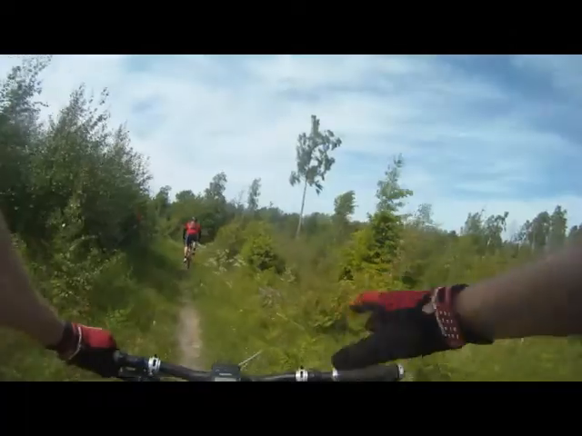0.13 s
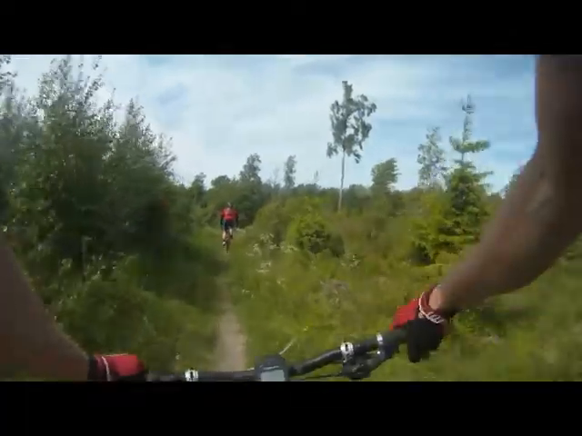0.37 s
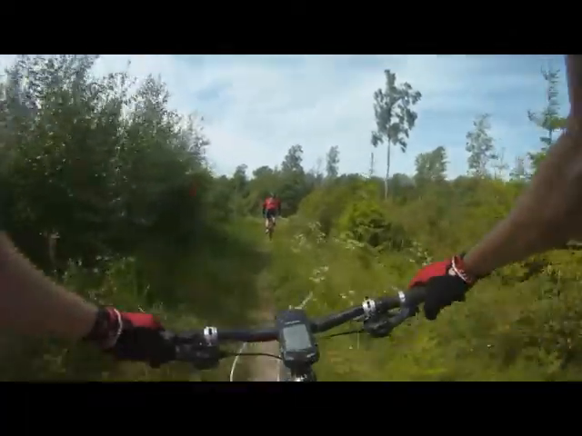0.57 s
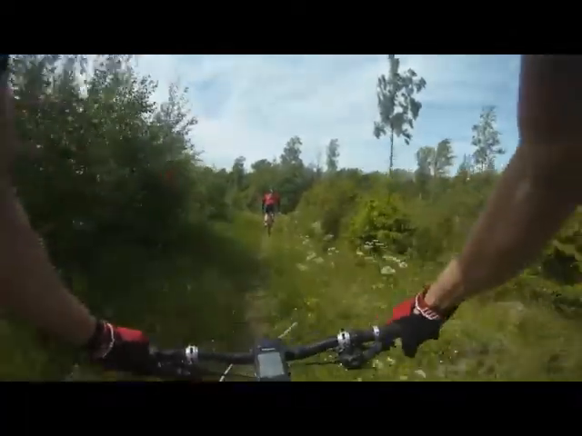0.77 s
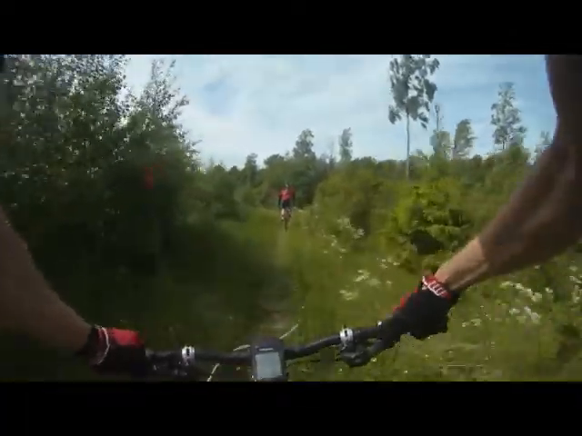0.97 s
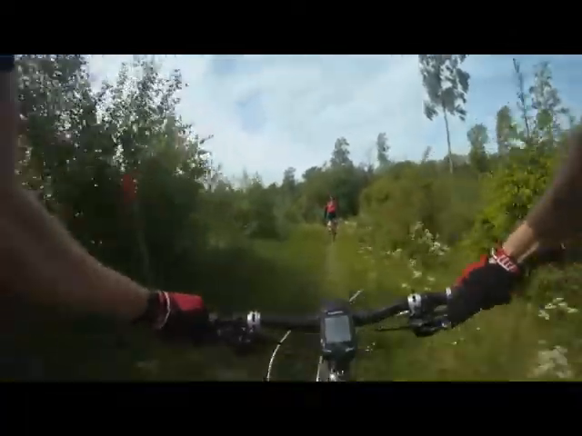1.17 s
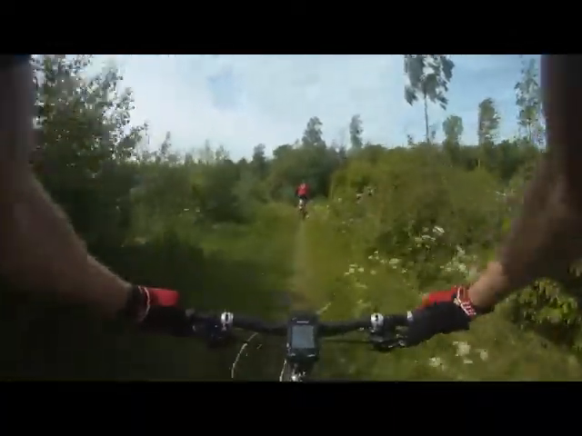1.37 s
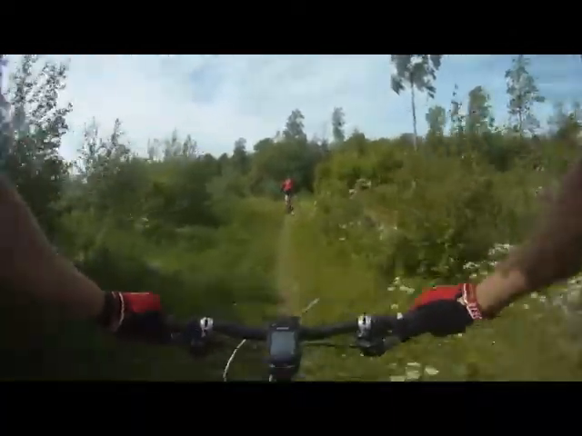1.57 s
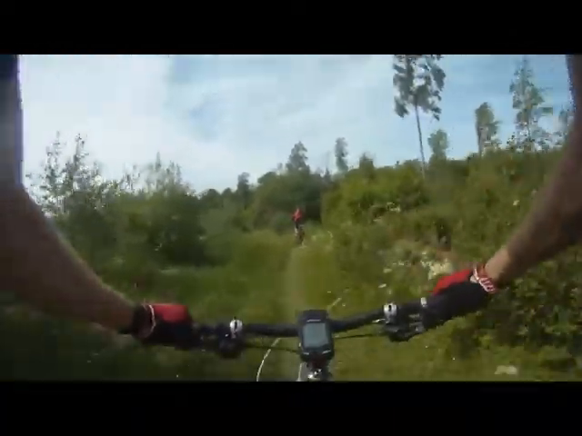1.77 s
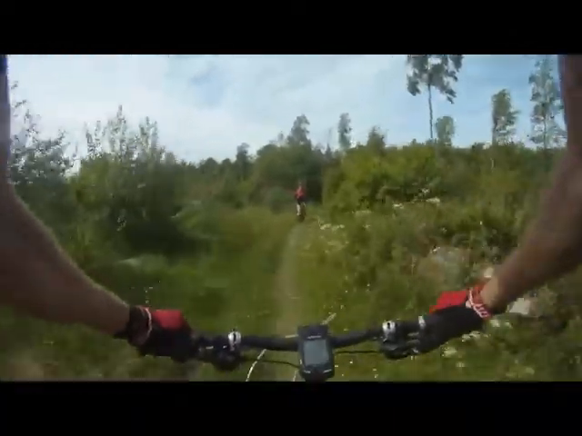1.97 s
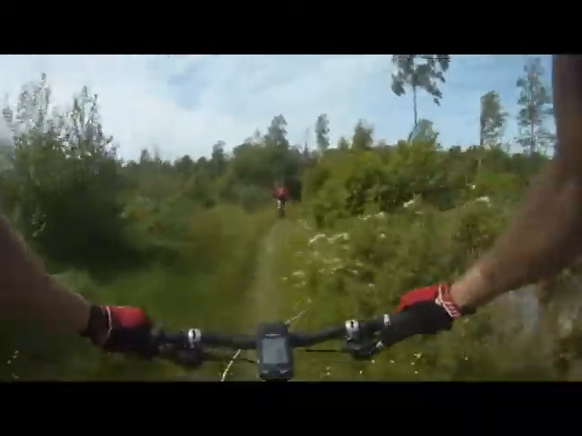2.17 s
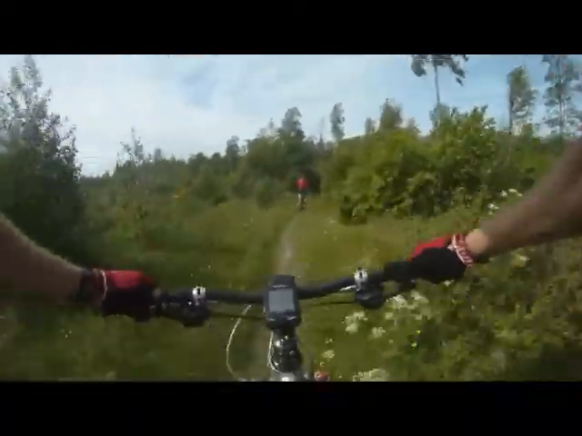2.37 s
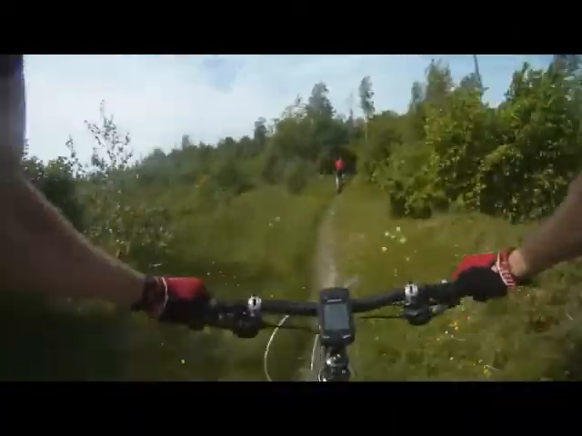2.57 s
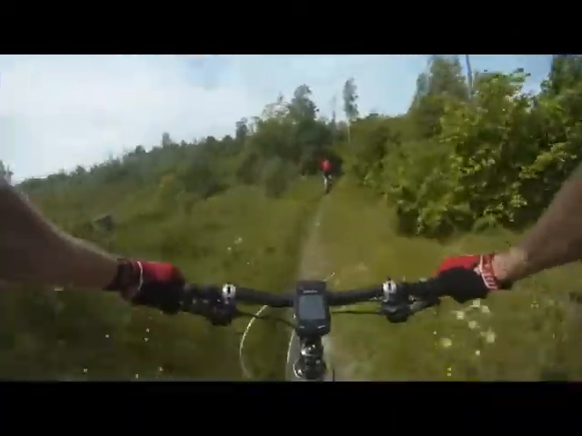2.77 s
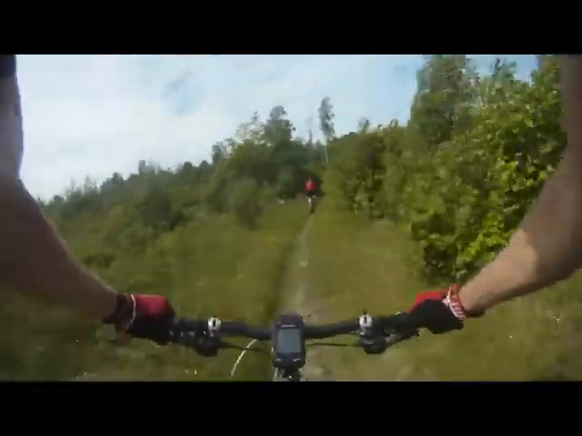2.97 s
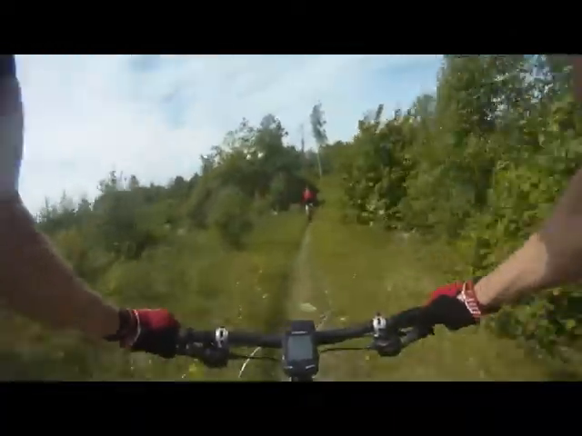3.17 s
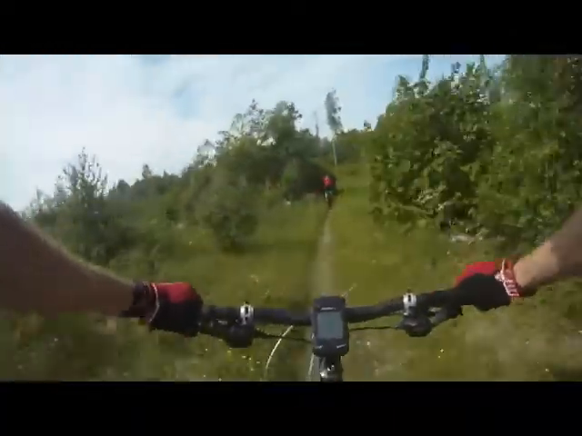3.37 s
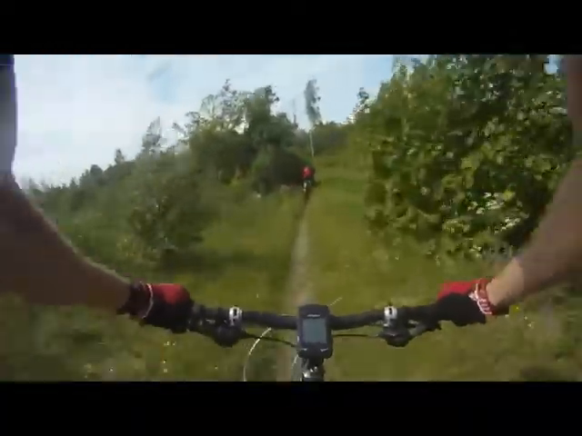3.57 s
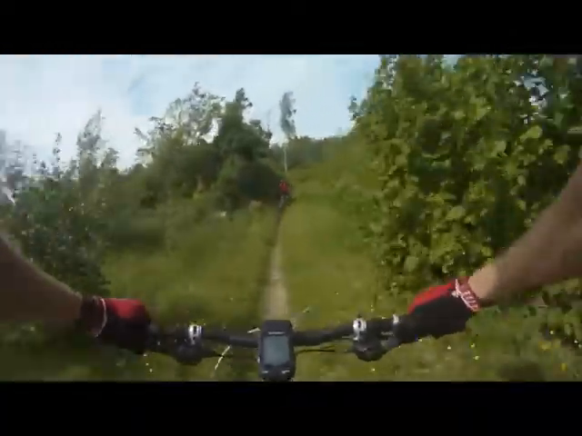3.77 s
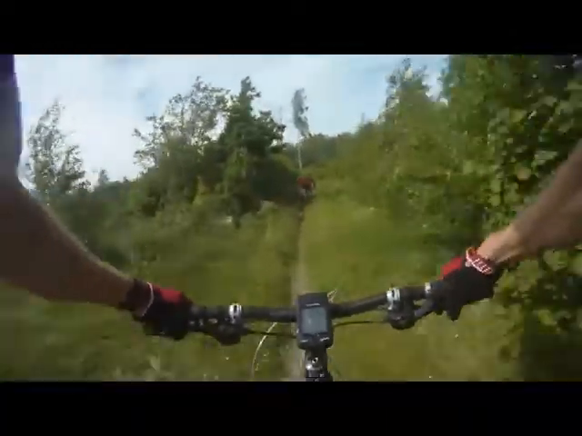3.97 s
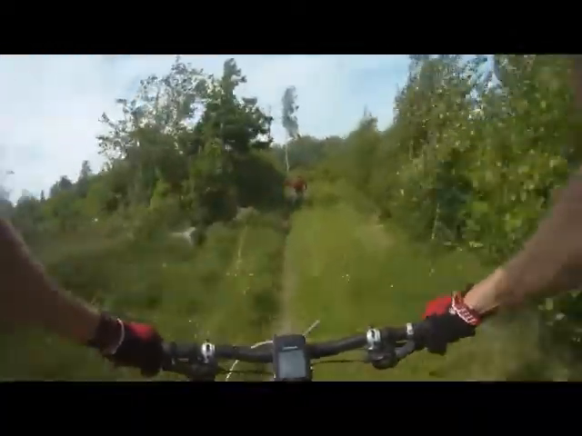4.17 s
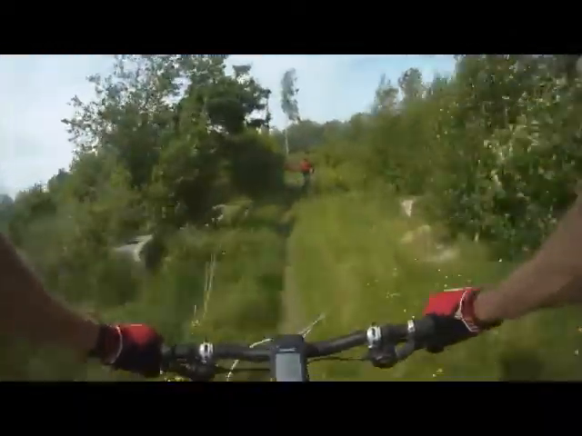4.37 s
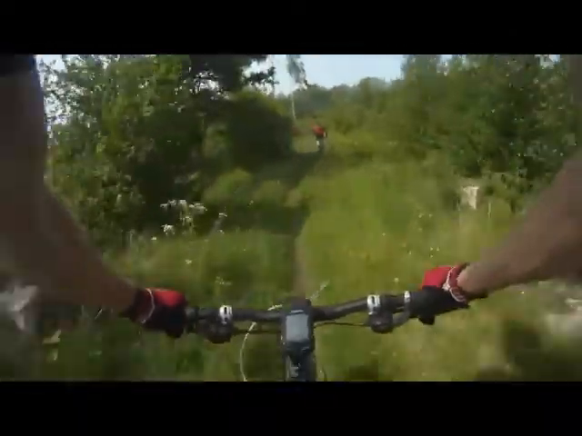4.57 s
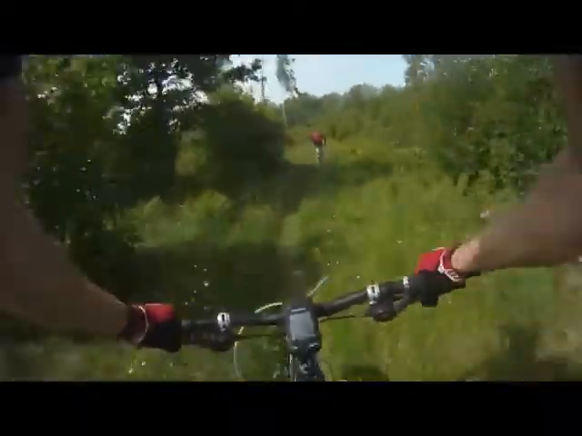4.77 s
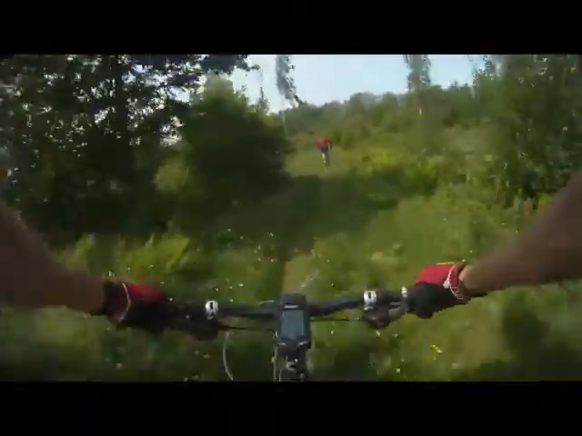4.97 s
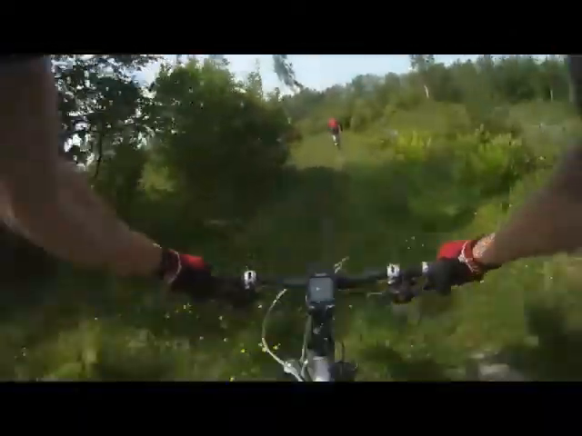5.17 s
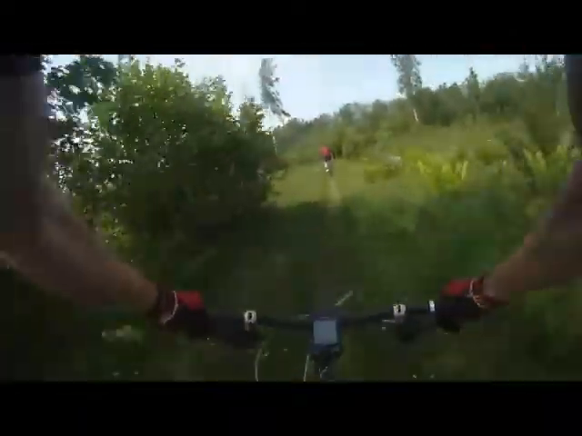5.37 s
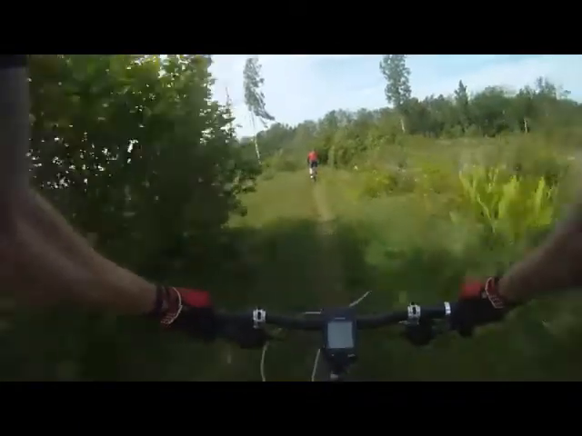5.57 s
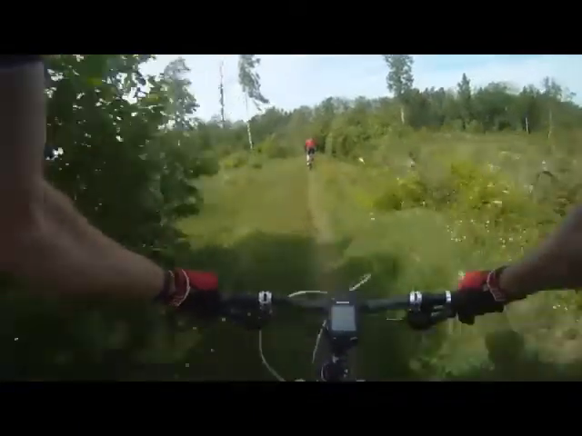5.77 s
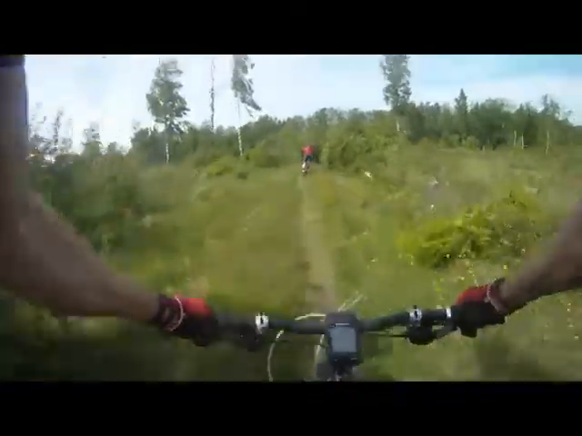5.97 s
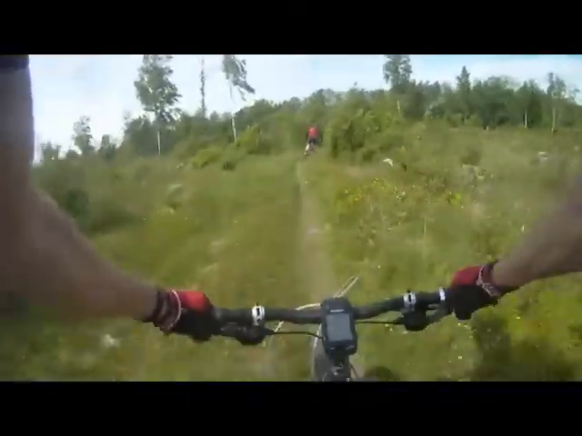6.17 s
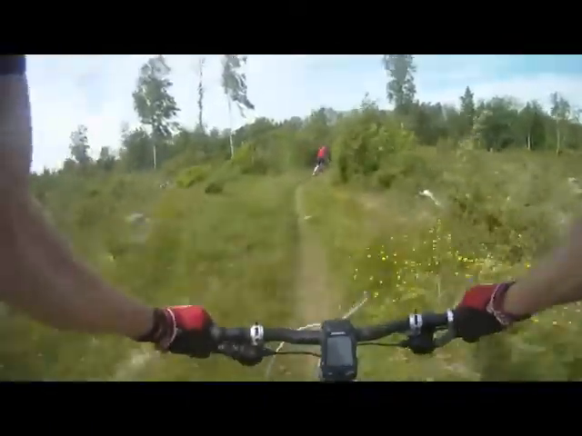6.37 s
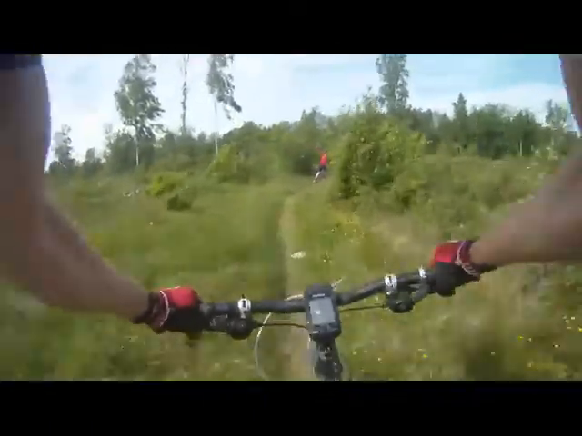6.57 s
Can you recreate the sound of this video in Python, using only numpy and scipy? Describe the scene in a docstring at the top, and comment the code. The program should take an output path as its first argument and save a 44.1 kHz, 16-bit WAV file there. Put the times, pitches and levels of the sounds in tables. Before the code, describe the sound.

A mountain bike runs down a bumpy trail through open grassland, heard through a plastic camera housing on the rider's chest, muffled yet gritty, with coarse treble. At 0 seconds a very loud, sharp knock cracks out with a tiny metallic tick. Until about 1.3 the wind is low and the tyre and grass hiss faint, with small clatters at 0.3, 0.6 and 1.1 to 1.3. More clattering comes at 1.5, and a wind puff at 1.6. Around 2.1 there are knocks and a short ping; at 2.4 another very loud, hollow knock with a clatter. From 2.5 wind rumbles heavily in uneven gusts, strongest about 3.1 to 3.8. Rattling clusters at 3.0 to 3.5, thin pings near 4.2, then hard clacks at 4.7 and 4.9. Wind, hiss and scattered clatters continue unevenly to 6.6, hiss lifting near 6.

```python
"""Bumpy dirt trail: a mountain bike rolls down it, heard by a small camera in a plastic housing on the rider's chest.
Wind buffets the microphone port: flickering noise bands, a low rumble and a brighter gust edge.
Sharp knocks and clatters ring the housing modes; a metal part pings as one decaying mode.
Tyre and grass hiss and a loose rattle lie behind. The camera samples slowly and holds each value,
mirroring the treble."""
import sys
import numpy as np
from scipy import signal
from scipy.fft import rfft, irfft, next_fast_len
from scipy.io import wavfile

SR = 44100
rng = np.random.default_rng(int(sys.argv[2]) if len(sys.argv) > 2 else 0)


def generate_wav(signal):
    """Clip the signal to [-1, 1] and save it as 16-bit WAV at the path in sys.argv[1]."""
    frames = np.transpose(np.atleast_2d(signal))
    scaled = np.clip(frames, -1, 1) * 32767
    pcm = np.round(scaled).astype(np.int16)
    wavfile.write(sys.argv[1], SR, pcm)


N = 291501

# wind course before trims: t/s, rumble level/dB, gust edge relative to rumble/dB
WIND_COURSE = [(0.04, -45, -16), (0.6, -50.5, -9), (1.15, -43.5, -8.5), (1.6, -32.5, -15.5),
               (1.67, -42, -12.5), (2.13, -43.5, -8), (2.37, -32, -16.5), (2.46, -41.5, 2.5),
               (2.52, -26.5, -12.5), (2.8, -31, -7), (3.1, -23, -7), (3.33, -33.5, -10), (3.63, -23, -14.5),
               (3.68, -29, -16), (3.73, -22, -6.5), (3.99, -34, -8), (4.11, -27, -9.5), (4.47, -35.5, -13),
               (4.78, -30.5, -11.5), (5.02, -36.5, -8), (5.08, -27.5, -12), (5.2, -32, -12),
               (5.37, -26.5, -11), (5.45, -31, -13), (5.8, -30, -7), (6.05, -29, -17), (6.19, -38.5, -12.5),
               (6.32, -28, -8.5), (6.54, -41.5, -5.5), (6.61, -32, -13)]
# wind rumble spectrum, relative density: f/Hz, level/dB per Hz
RUMBLE_SPECTRUM = [(12, -44), (20, -0.5), (70, 2.5), (124, -4.5), (200, -14), (260, -30), (440, -120)]
# gust edge spectrum, relative density: f/Hz, level/dB per Hz
EDGE_SPECTRUM = [(100, 4.5), (160, 0), (250, -3), (400, -10), (700, -17), (1200, -25.5), (2000, -28.5)]
RUMBLE_TRIM_DB, EDGE_TRIM_DB = 1.5, 5.0

# free housing modes: f/Hz, level/dB, t60/s
HOUSING_MODES = [(530, -2, .025), (720, -8, .02), (1035, 0, .03), (1260, -2, .022), (1520, -6, .022),
                 (1990, 0, .022), (2220, -1, .016), (2710, -2, .016), (3200, -9, .014), (3650, -8, .018)]
LOW_MODES, MIDDLE_MODES, HIGH_MODES, TOP_MODES = slice(0, 2), slice(2, 5), slice(5, 7), slice(7, 9)

# sharp housing knocks: t/s, high-mode peak level/dB; relative to it: low, middle, top modes, dry crack/dB
KNOCK_EVENTS = [(0.0028, -9, -19, -0.5, 10, 8), (0.3074, -41, 5.5, 8.5, 0, -4),
                (0.5082, -50.5, 19.5, 18, -16, -15), (1.3493, -35, -13, 8, 0, -22),
                (1.48, -38, -25, -18, -21, 1.5), (1.704, -41, -6, 4.5, -4, -8),
                (1.9439, -31.5, -27, -28, -27, 1.5), (2.0273, -44, -6, 4, 0.5, -18),
                (2.1308, -38.5, 7.5, 6, 2, 10), (2.4124, -7, -10, 1.5, -3.5, -24),
                (2.6995, -53, 18, 21, -7, -2), (2.9816, -31.5, -24, -18, -21.5, -2),
                (3.2207, -39, 14, 8, -3, 9.5), (3.4411, -41, 3, 12, 9, 15.5), (3.723, -38, -1, -14, 0, 10),
                (4.14, -34.5, -5, -18, -16, -3), (4.3344, -47.5, 15.5, 14.5, -8, 12),
                (4.6955, -40.5, -3, 7, 6, 13), (4.775, -51, 20.5, 0, 0, 2),
                (4.9355, -38.5, 12, -12, 16.5, 15.5), (5.357, -36.5, 7, 11.5, 8, 9)]
TOUCH_S = .00025
KNOCK_RING = 0.85   # share of free t60 left while the housing is pressed
THUD_DB = -7.5   # relative to low modes

# clatters of chain, cables, brushing stems placed by hand, strong and faint:
# t/s, peak level/dB, colour centre f/Hz, decay constant/s
PLACED_CLATTERS = [(0.3144, -34.5, 3200, 0.009), (0.612, -31.5, 2410, 0.024), (1.1, -40, 2090, 0.014),
                   (1.15, -37, 2300, 0.018), (1.259, -32.5, 2380, 0.022), (1.505, -30.5, 3300, 0.032),
                   (1.536, -28.5, 2400, 0.017), (2.1363, -35, 3660, .0062), (2.428, -22.5, 3300, 0.011),
                   (2.5945, -31, 2400, 0.0032), (2.735, -32.5, 2300, 0.009), (2.8684, -45.5, 3600, 0.0035),
                   (3.054, -30.5, 2400, 0.0082), (3.13, -29, 2900, 0.0092), (3.161, -27.5, 3400, 0.008),
                   (3.1754, -31, 3800, .003), (3.199, -35, 3370, .004), (3.2755, -30, 3000, 0.0022),
                   (3.325, -49, 3570, .008), (3.3485, -34, 3200, 0.0055), (3.4165, -26, 3360, 0.0044),
                   (3.4516, -25, 2580, 0.036), (3.527, -26, 1800, 0.015), (4.5136, -31, 3040, 0.0015),
                   (4.5326, -36, 3300, 0.0055), (4.576, -29, 3700, 0.018), (4.6778, -35, 2840, 0.0064),
                   (4.7257, -18.5, 3220, 0.0043), (4.754, -29.5, 2900, 0.0029), (4.828, -29, 3550, 0.0023),
                   (4.9302, -20.5, 2460, 0.012), (4.916, -47, 2440, .004), (4.982, -24.5, 2680, 0.0013),
                   (5.067, -31.5, 2700, 0.003), (5.03, -43, 2500, 0.0033), (5.164, -57, 2880, .004),
                   (5.1944, -32, 3500, 0.0067), (5.347, -28, 3450, 0.014), (5.6396, -33, 2680, .0054),
                   (5.925, -38, 2800, 0.0043), (6.1853, -36, 2650, 0.0027), (6.4067, -31.5, 3700, 0.0089)]
CRACK_LOW_HZ = 2570
SMALL_CLATTERS = 90
SMALL_OVER_ROLLING_DB, SMALL_SPREAD_DB = 17, 3   # over untrimmed rolling level; +- spread
SMALL_DECAY_S, SMALL_LOW_HZ, SMALL_HIGH_HZ = .0015, 2510, 4060

# small metal part: t/s, peak level/dB, t60/s (raised to PING_MIN_T60_S if shorter)
PING_EVENTS = [(0.007, -25, 0.005), (2.0802, -44, 0.013), (2.1316, -26.5, 0.011), (2.3111, -36.5, 0.02),
               (2.4314, -43, 0.14), (3.2196, -33.5, 0.017), (3.3204, -30, 0.046), (4.1834, -39.5, 0.087),
               (4.2283, -34, 0.11), (4.5321, -35, 0.025)]
PING_HZ, PING_MIN_T60_S = 3523, .01

# tyres and grass before trim: t/s, rolling level/dB
ROLLING_COURSE = [(0.03, -59), (0.51, -56.5), (0.83, -62), (1.14, -59), (1.31, -57), (2.1, -59.5),
                  (2.35, -53.5), (2.85, -54.5), (3.34, -47), (3.51, -51), (4.53, -55), (4.75, -50.5),
                  (4.88, -49), (5.41, -52.5), (5.65, -55.5), (5.96, -48), (6.27, -56.5), (6.6, -55)]
# rolling hiss spectrum, relative density: f/Hz, level/dB per Hz
HISS_SPECTRUM = [(300, -5), (600, 0.5), (850, -21), (1060, 1), (1600, -10.5), (2370, 1.5), (3040, 0.5),
                 (3570, -3.5), (4140, -6.5), (4990, -19.5), (6200, -11)]
ROLLING_TRIM_DB = 3.3
RATTLE_MEDIAN_PER_S, RATTLE_DB = 170, -9   # contact rate; level relative to hiss

HOLD_HZ, EDGE_HZ, CUTOFF_HZ = 12000, 5460, 11900   # sampling rate, low-pass before it, low-pass after it


def from_db(db):
    """Decibels to gain."""
    return 10 ** (np.asarray(db) / 20)


def rms_one(x):
    """Scale to unit rms."""
    return x / np.sqrt(np.mean(x ** 2) + 1e-20)


def in_time(rows):
    """Columns of a curve table at every sample."""
    s, *columns = np.transpose(rows)
    return [np.interp(np.arange(N) / SR, s, c) for c in columns]


def drift(corner_hz):
    """Slow chance of rms 1: noise at SR / 40 through a double one-pole low-pass."""
    r = np.exp(-2 * np.pi * corner_hz * 40 / SR)
    coarse = rng.standard_normal(N // 40 + 2002)
    slow = signal.lfilter([1], [1, -2 * r, r * r], coarse)[2000:]   # drop the run-in
    return np.interp(np.arange(N) / 40, np.arange(len(slow)), rms_one(slow))


def ring(force, hz, t60_s):
    """Two-pole resonator: a unit click sets a decaying sine of height 1 ringing."""
    r = from_db(-60 / (t60_s * SR))
    w = 2 * np.pi * hz / SR
    return signal.lfilter([0, np.sin(w)], [1, -2 * r * np.cos(w), r * r], force + 1e-18)


def banded_noise(spectrum, shared_db, own_db, corner_hz):
    """Third-octave bands of noise that flicker partly together, partly alone; rms 1."""
    hz, level_db = np.transpose(spectrum)
    edges_hz = hz[0] * 2 ** np.arange(0, np.log2(hz[-1] / hz[0]) + .01, 1 / 3)
    together = drift(corner_hz)
    white = rng.standard_normal((2, N + 8192))   # a run-in lets the low bands settle
    out = 0
    for k, (low_hz, high_hz) in enumerate(zip(edges_hz, edges_hz[1:])):
        sos = signal.butter(2, [low_hz, high_hz], "band", fs=SR, output="sos")
        band = signal.sosfilt(sos, white[k % 2])[-N:]   # neighbours use different noise
        band_db = np.interp(np.log(low_hz * high_hz) / 2, np.log(hz), level_db)
        flicker_db = shared_db * together + own_db * drift(corner_hz)
        out = out + from_db(band_db + flicker_db) * band
    return rms_one(out)


def add(out, s, peak_db, sound):
    """Lay a short sound into the track at its moment and peak level."""
    at = round(s * SR)
    out[at:at + len(sound)] += (from_db(peak_db) * sound / np.abs(sound).max())[:N - at]


def wind(wind_db, edge_db):
    """Lumpy pressure on the port; its brighter edge flares in short puffs."""
    rumble = banded_noise(RUMBLE_SPECTRUM, shared_db=1.0, own_db=1.5, corner_hz=10.0)
    edge = banded_noise(EDGE_SPECTRUM, shared_db=3., own_db=0.5, corner_hz=32.7)
    rumble_gain = from_db(wind_db + RUMBLE_TRIM_DB)
    edge_gain = from_db(wind_db + edge_db + EDGE_TRIM_DB)
    return rumble_gain * rumble + edge_gain * edge


def knocks():
    """One short touch rings groups of modes, shared by where it lands; a crack above, a thud below."""
    out, size = np.zeros(N), 2048
    spread_db = rng.normal(0, 1.5, (len(KNOCK_EVENTS), len(HOUSING_MODES)))
    grit_decay = np.exp(-np.arange(size) / (.0013 * SR))
    grit = rng.standard_normal((len(KNOCK_EVENTS), size)) * grit_decay
    thin = signal.butter(2, [3100, 5000], "band", fs=SR, output="sos")
    dull = signal.butter(2, [280, 480], "band", fs=SR, output="sos")
    touch = -np.hanning(round(TOUCH_S * SR) + 2)   # a soft contact spares the treble
    for k, (s, high_db, low_db, middle_db, top_db, crack_db) in enumerate(KNOCK_EVENTS):
        force = np.convolve(np.r_[1, .1 * grit[k, 1:]], touch)[:size]
        rings = np.array([from_db(level_db + chance_db) * ring(force, hz, KNOCK_RING * t60_s)
                          for (hz, level_db, t60_s), chance_db in zip(HOUSING_MODES, spread_db[k])])
        groups = ((LOW_MODES, low_db), (MIDDLE_MODES, middle_db), (HIGH_MODES, 0), (TOP_MODES, top_db))
        for modes, share_db in groups:
            # the shell passes each group in its own band only, so the ring builds up over a cycle or two
            edges_hz = HOUSING_MODES[modes][0][0] / 1.2, HOUSING_MODES[modes][-1][0] * 1.15
            band = signal.butter(1, edges_hz, "band", fs=SR, output="sos")
            add(out, s, high_db + share_db, signal.sosfilt(band, rings[modes].sum(axis=0)))
        add(out, s, high_db + crack_db, signal.sosfilt(thin, grit[k]))
        add(out, s, high_db + low_db + THUD_DB, signal.sosfilt(dull, force))
    return out


def housing(force, centre_hz, below_db, above_db, own_db):
    """Modes rung by a force, rms 1; those away from its colour lose some dB per octave."""
    out = 0
    for (hz, level_db, t60_s), chance_db in zip(HOUSING_MODES, own_db):
        octaves = np.log2(hz / centre_hz)
        loss_db = above_db * max(octaves, 0) - below_db * min(octaves, 0)
        out = out + from_db(level_db + chance_db - loss_db) * ring(force, hz, t60_s)
    return rms_one(out)


def clatters(rows):
    """A swelling and dying swarm of uneven contacts, partly rung by the housing, partly bright noise."""
    out, size = np.zeros(N), 5120
    spread_db = rng.normal(0, 3., (len(rows), len(HOUSING_MODES)))
    uneven = from_db(4. * rng.standard_normal((len(rows), size)))
    swarm = rng.standard_normal((len(rows), size)) * uneven
    thin = signal.butter(2, CRACK_LOW_HZ, "high", fs=SR, output="sos")
    for k, (s, peak_db, centre_hz, decay_s) in enumerate(rows):
        age = np.arange(size) / SR / decay_s
        force = swarm[k] * age ** .3 * np.exp(-age)
        body = housing(force, centre_hz, below_db=20., above_db=9., own_db=spread_db[k])
        bright = rms_one(signal.sosfilt(thin, force))
        add(out, s, peak_db, body + from_db(-2.0) * bright)
    return out


def small_clatters(rolling_db):
    """Rows like PLACED_CLATTERS, drawn at random; rough ground brings more and louder ones."""
    when, size, colour = rng.random((SMALL_CLATTERS, 3)).T
    share = np.cumsum(from_db(rolling_db))
    at = np.searchsorted(share / share[-1], when)
    peak_db = rolling_db[at] + SMALL_OVER_ROLLING_DB + SMALL_SPREAD_DB * (2 * size - 1)
    centre_hz = SMALL_LOW_HZ * (SMALL_HIGH_HZ / SMALL_LOW_HZ) ** colour
    return list(zip(at / SR, peak_db, centre_hz, np.full(len(at), SMALL_DECAY_S)))


def pings():
    """One clear mode, struck once and then jostled by smaller touches."""
    out, size = np.zeros(N), 8192
    jostle_decay = np.exp(-np.arange(size) / (.014 * SR))
    force = rng.standard_normal((len(PING_EVENTS), size)) * jostle_decay
    force[:, 0] = 3.   # the strike
    for k, (s, peak_db, t60_s) in enumerate(PING_EVENTS):
        add(out, s, peak_db, ring(force[k], PING_HZ, max(t60_s, PING_MIN_T60_S)))
    return out


def rolling(rolling_db):
    """Tyres on dirt and brushing grass hiss through the housing, with the rattle on top."""
    hiss = banded_noise(HISS_SPECTRUM, shared_db=1.8, own_db=1.6, corner_hz=30.0)
    return from_db(rolling_db + ROLLING_TRIM_DB) * (hiss + from_db(RATTLE_DB) * rattle())


def rattle():
    """Clumped small contacts, each striking the upper housing modes with strengths of its own; rms 1."""
    born = rng.random(N) < RATTLE_MEDIAN_PER_S * from_db(5. * drift(8.)) / SR
    strength = from_db(4. * np.minimum(rng.exponential(1, N), 2.5))
    clicks = born * strength * rng.choice([-1, 1], N)
    out = 0
    for hz, level_db, t60_s in HOUSING_MODES[2:]:
        struck = clicks * rng.standard_normal(N) * from_db(level_db)
        out = out + ring(struck, hz, 0.2 * t60_s)
    return rms_one(out)


def scene():
    """All sources at the microphone."""
    wind_db, edge_db = in_time(WIND_COURSE)
    rolling_db, = in_time(ROLLING_COURSE)
    contacts = knocks() + clatters(PLACED_CLATTERS + small_clatters(rolling_db)) + pings()
    return (wind(wind_db, edge_db) + contacts + rolling(rolling_db))[None]


def record(dry):
    """Overload, a filter under half the sampling rate, then held samples: a mirror image under a sinc slope."""
    low_pass = signal.butter(16, EDGE_HZ, fs=SR, output="sos")
    x = signal.sosfilt(low_pass, np.clip(dry, -1.2, 1.2))
    x = x * (1 + 2 * np.cos(2 * np.pi * HOLD_HZ * np.arange(N) / SR))   # mirrors the band about HOLD_HZ / 2
    size = next_fast_len(N)
    hold_slope = np.sinc(np.fft.rfftfreq(size, 1 / SR) / HOLD_HZ)
    x = irfft(rfft(x, size) * hold_slope, size)[:, :N]
    smooth = signal.ellip(10, .5, 80, CUTOFF_HZ, fs=SR, output="sos")
    return signal.sosfilt(smooth, np.clip(x, -.92, .92))


dry = scene()
out = record(dry)
generate_wav(out)
```